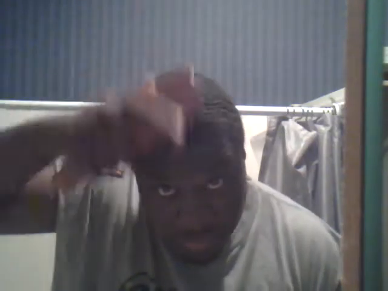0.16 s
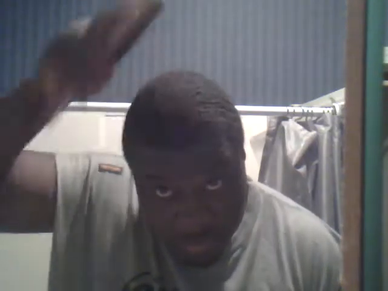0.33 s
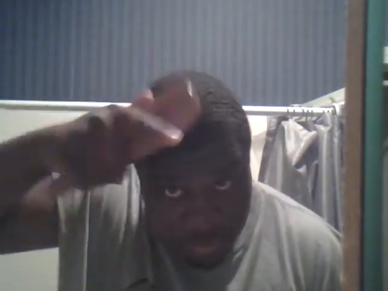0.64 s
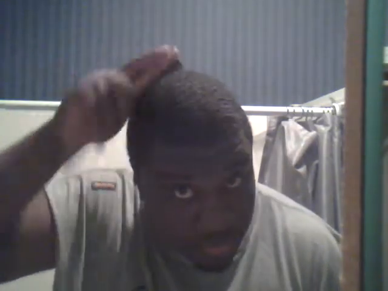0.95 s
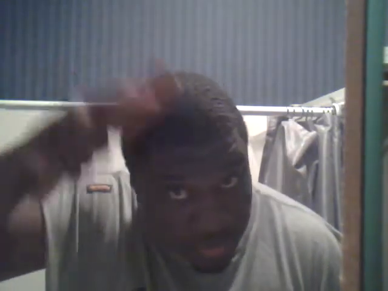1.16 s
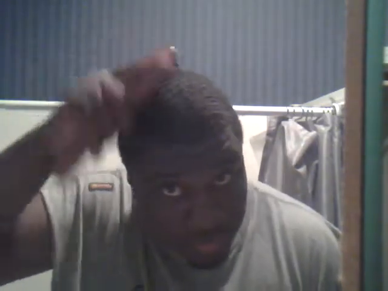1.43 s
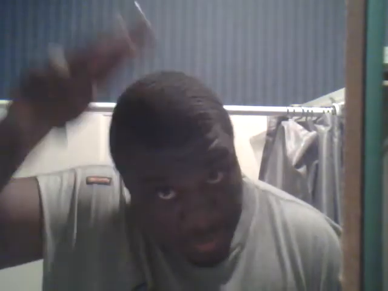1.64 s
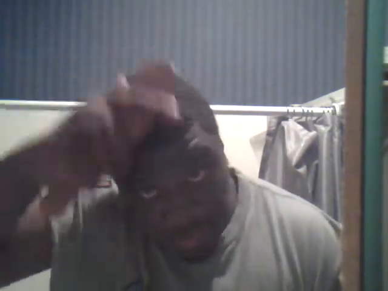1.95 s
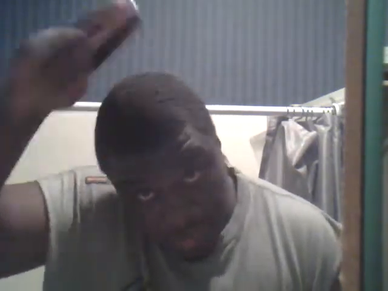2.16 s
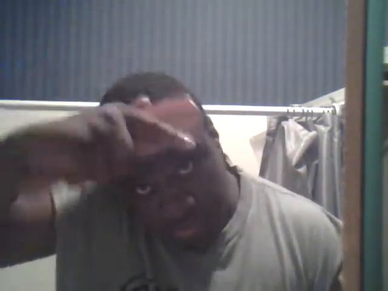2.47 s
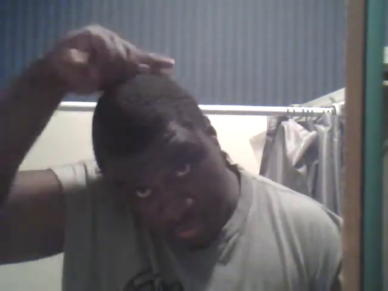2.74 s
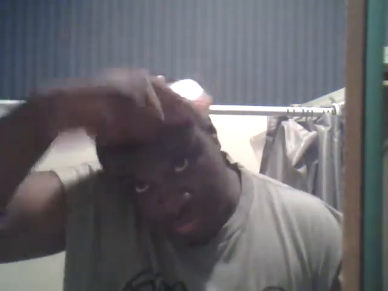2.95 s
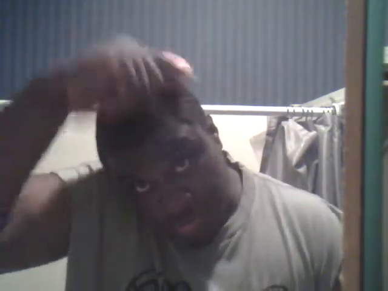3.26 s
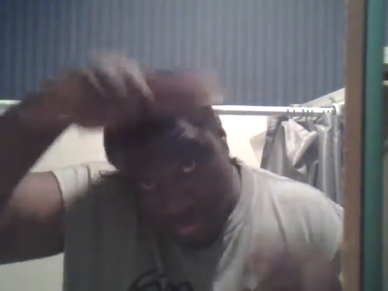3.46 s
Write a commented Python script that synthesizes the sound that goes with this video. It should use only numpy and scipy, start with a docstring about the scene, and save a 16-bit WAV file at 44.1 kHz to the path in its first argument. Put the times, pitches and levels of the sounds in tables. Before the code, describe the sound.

A bristle brush sweeps short hair in quick strokes of about a quarter second. The tail of one opens the sound, then strokes start near 0.25, 0.7, 1.1, 1.6, 2.0, 2.5, 2.95 and 3.4 seconds, bright, hissy and raspy, softer later. Faint return grazes come near 1.3 and 3.2, dull arm bumps near 0.8 and 1.3. A steady low fan hum continues throughout the small, close-miked bathroom.

```python
"""Small bathroom: a bristle brush sweeps over short hair about twice a second, over a steady fan.
Each stroke is a shower of random bristle flicks, coloured as broad hiss, lower rasp, dull scrub and
a sharp ring near 6.4 kHz; stray hairs crackle and the moving arm bumps softly.
The fan is coloured noise, steady tones, narrow resonances and a thin hiss.
Two close microphones feed a stereo widener, which thins the bass and hollows the treble like a comb."""
import sys
import numpy as np
from scipy import signal
from scipy.fft import rfft, irfft
from scipy.io import wavfile
from scipy.ndimage import uniform_filter1d

SR = 44100
rng = np.random.default_rng(int(sys.argv[2]) if len(sys.argv) > 2 else 0)


def output_pcm(signal):
    """Save a mono or channel-first signal as 16-bit PCM at the path in sys.argv[1].

    Samples are clipped to [-1, 1] before scaling.
    """
    pcm = np.clip(np.atleast_2d(signal).T, -1, 1) * 32767
    wavfile.write(sys.argv[1], SR, np.round(pcm).astype(np.int16))


N = 158760
LEFT_RIGHT_SIGNS = np.array([[1], [-1]])


def undb(db):
    """Decibels to amplitude gain."""
    return 10 ** (np.asarray(db) / 20)


def fft_hz():
    """Bin frequencies of the full-length spectrum."""
    return np.arange(N // 2 + 1) * SR / N


def colour(white, spectrum):
    """Shape white sound of unit power to a spectral density, interpolated over log frequency."""
    hz, db_per_hz = np.array(spectrum, float).T
    f = np.maximum(fft_hz(), 1)
    gain = undb(np.interp(np.log(f), np.log(hz), db_per_hz)) * np.sqrt(SR / 2)
    return irfft(rfft(white) * gain, N)


def narrow(hz, width_hz):
    """Noise of unit power passed by one resonance."""
    response = 1 / (1 + 2 * ((fft_hz() - hz) / width_hz) ** 2)
    noise = irfft(rfft(rng.standard_normal(N)) * response, N)
    return noise / noise.std()


def walk(rate_hz):
    """Smooth random drift of unit spread: held random values under a moving average."""
    hold = max(int(SR / rate_hz), 2)
    steps = np.repeat(rng.standard_normal(N // hold + 1), hold)
    drift = uniform_filter1d(steps, hold)[:N]
    return drift / drift.std()


def lean(x, share):
    """Place one sound between the microphones: -1 right, 1 left."""
    return x * (1 + share * LEFT_RIGHT_SIGNS)


def tilt(pair, right_db):
    """Favour the right microphone; mid and side of an unrelated pair keep unit power."""
    gain = undb(np.array([[-right_db], [right_db]]) / 2)
    return pair * 2 * gain / np.sqrt(np.sum(gain ** 2))


def late(pair, lag_ms):
    """Delay the left channel by a fraction of a millisecond through its phase."""
    delay = np.exp(-2j * np.pi * fft_hz() * lag_ms / 1000)
    return np.array([irfft(rfft(pair[0]) * delay, N), pair[1]])


# faint hiss of the fan: f/Hz, level/dB per Hz
FLOOR_SPECTRUM = [(1000, -106), (2200, -86.5), (2700, -94.5), (3250, -86.5), (4500, -98), (7000, -93),
                  (9000, -99), (12000, -101), (15700, -103)]


def thin_hiss():
    """Steady noise, unrelated at the two microphones and louder at the right one."""
    return tilt(colour(rng.standard_normal((2, N)), FLOOR_SPECTRUM), right_db=5)


# rushing air common to both microphones: f/Hz, level/dB per Hz
AIR_MID_SPECTRUM = [(30, -79), (60, -74.5), (95, -64.5), (155, -61.5), (185, -57.5), (226, -67),
                    (250, -45.5), (280, -49.5), (305, -55), (390, -62), (430, -68), (510, -71.5),
                    (580, -64.5), (660, -71), (690, -83), (770, -77.5), (900, -81), (1050, -87),
                    (1130, -79), (1280, -81), (1500, -78), (1900, -87.5), (2600, -100), (4000, -125)]
# rushing air of opposite sign at the two microphones: f/Hz, level/dB per Hz
AIR_SIDE_SPECTRUM = [(30, -100), (60, -92), (95, -72), (200, -80), (260, -74.5), (400, -71.5), (480, -89),
                     (620, -70), (700, -72.5), (840, -88), (1020, -77), (1500, -83), (2000, -87),
                     (4000, -125)]


def rushing_air():
    """Turbulence as coloured noise, one part common and one part opposed."""
    mid = colour(rng.standard_normal(N), AIR_MID_SPECTRUM)
    side = colour(rng.standard_normal(N), AIR_SIDE_SPECTRUM)
    return mid + side * LEFT_RIGHT_SIGNS


# resonances of fan and duct: f/Hz, width/Hz, level/dB, lean (-1 right to 1 left)
RESONANCES = [(201.3, 11, -39, -0.019), (454.2, 8.4, -51, .1), (485, 4.2, -51, 0.16), (553.6, 21, -50, .1),
              (603.3, 12, -52.5, 0.31), (628.6, 8.4, -48.5, .44), (654.6, 8.2, -57.5, 0.45),
              (737, 6, -59.5, -0.38), (775, 1.7, -60, -.2), (794, 16, -56.5, -.1), (843, 3, -63.5, 0),
              (1104, 20, -60, -0.71), (1344, 8, -64.5, -0.0012), (1453, 18, -57.5, -0.058),
              (1523, 16, -61, -0.13)]
# faint high whines: f/Hz, width/Hz, level/dB, lean (-1 right to 1 left)
WHINES = [(5570, 110, -66.5, -.9), (11150, 340, -60.5, -.9)]


def resonances():
    """Narrow bands of noise, each leaning to one microphone."""
    out = 0
    for hz, width_hz, db, side in RESONANCES + WHINES:
        out = out + lean(undb(db) * narrow(hz, width_hz), side)
    return out


# motor and blade tones: f/Hz, level/dB RMS, lean (-1 right to 1 left), left delay/ms
HUM_TONES = [(120, -49.5, .38, 2.2), (168.8, -41, 0, .05), (240, -35.5, -.13, .02),
             (408.6, -54.5, -.1, .39), (457.4, -48.5, .13, 0), (479.7, -50, .11, .05),
             (506.2, -59.5, .05, .13), (528.5, -54, .05, .06), (626.2, -45.5, .43, .14),
             (648.5, -52.6, .3, .17), (670.8, -57.8, .64, .55), (719.6, -66.3, -.77, .2),
             (746, -65, -.46, 0), (768.4, -63, -.14, 0), (959.5, -71, .28, .11)]


def hum(t):
    """Steady sines; standing waves give each its own level and delay at the two microphones."""
    out = 0
    for hz, db, side, lag_ms in HUM_TONES:
        heard_s = t - np.array([[lag_ms / 1000], [0]])
        tone = np.sin(2 * np.pi * (hz * heard_s + rng.random()))
        out = out + lean(np.sqrt(2) * undb(db) * tone, side)
    return out


FAN_LEFT_LAG_MS = 0.036  # air and resonances only


def fan(t):
    """Air and resonances reach the left microphone late; hum and thin hiss add to them."""
    return late(rushing_air() + resonances(), FAN_LEFT_LAG_MS) + hum(t) + thin_hiss()


# dull bumps of the moving arm: t/s, length/s, level/dB re BUMP_BASE_DB
BUMPS = [(.82, .12, -4), (1.32, .16, 0)]
BUMP_HZ, BUMP_WIDTH_HZ, BUMP_BASE_DB = 138, 45, -43


def arm(t):
    """Low narrow noise under bell-shaped swells as the arm swings."""
    swell = sum(undb(db) * np.exp(-(2 * (t - at_s) / length_s) ** 2) for at_s, length_s, db in BUMPS)
    return lean(narrow(BUMP_HZ, BUMP_WIDTH_HZ) * swell * undb(BUMP_BASE_DB), 0)


FLICKS_PER_S, FLICK_SPREAD_DB = 10000, 4
SHARED_POWER = 0.13  # share of flick power common to both microphones
BRUSH_RIGHT_DB = 5


def flicks():
    """Bristles snap free at random, each with its own strength, mostly unlike at the two microphones."""
    strength = undb(FLICK_SPREAD_DB * np.clip(rng.standard_normal((3, N)), -2, 2))
    snaps = rng.random((3, N)) < FLICKS_PER_S / SR
    clicks = snaps * rng.choice([-1, 1], (3, N)) * strength
    pair = np.sqrt(1 - SHARED_POWER) * clicks[:2] + np.sqrt(SHARED_POWER) * clicks[2]
    return tilt(pair / clicks.std(), BRUSH_RIGHT_DB)


# stray hairs: f/Hz, level/dB per Hz, before the burst envelope
CRACKLE_SPECTRUM = [(1200, -102), (2200, -93.5), (3400, -90), (4500, -87), (7000, -101.5), (15000, -106)]
CATCHES_PER_S, CATCH_DECAY_S = 40, 0.0088


def crackle(t):
    """Hairs catch at random during a sweep; each starts a sharp, decaying burst of flicks."""
    touching = sum((t > start) & (t < start + length) for start, length, *_ in STROKES + GRAZES) > 0
    catches = touching * (rng.random(N) < CATCHES_PER_S / SR)
    bursts = signal.fftconvolve(catches, np.exp(-t / CATCH_DECAY_S))[:N]
    return colour(flicks() * bursts, CRACKLE_SPECTRUM)


ATTACK_S, RELEASE_S = 0.04, 0.058
ARCH_POWER = 1.64  # 2 is a round swell, 1 a pointed one


def sweep(t, start_s, length_s, peak, arch_db):
    """The brush lands, speeds up and slows over the curve of the head, then lifts."""
    landing = np.clip((t - start_s) / ATTACK_S, 0, 1)
    lifting = np.clip((start_s + length_s - t) / RELEASE_S, 0, 1)
    progress = np.clip((t - start_s) / length_s, 0, 1)
    return landing * lifting * undb(-arch_db * np.abs(2 * (progress - peak)) ** ARCH_POWER)


# brush strokes: t/s, length/s, fastest point (0-1), drop half a stroke from there/dB,
# then relative level/dB of hiss, ring, rasp, scrub; lead and arch below alter peak and drop per part
STROKES = [(-.18, .23, 0.43, 15, 4.5, 3, -1, 3), (0.247, .26, 0.43, 19.5, 0.5, 0.5, -2, -2),
           (.699, .22, 0.47, 6, -1.5, -1.5, -5, -13), (1.128, 0.24, 0.49, 15.5, -0.5, 0, -3.5, -13),
           (1.584, .235, 0.46, 16.5, -0.5, 0.5, -4.5, -5), (2.021, 0.29, .41, 7, -3.5, -6, -4.5, -1.5),
           (2.499, 0.24, 0.39, 5.5, -3, -5, -4.5, -4), (2.952, 0.26, 0.51, 6.5, -6.5, -8.5, -6.5, -5.5),
           (3.412, 0.22, 0.35, 8, -6, -7.5, -6, -5)]
# bristles graze the hair on the way back: same columns
GRAZES = [(1.315, 0.34, 1, 3, -24, -20, -10, -6), (3.177, 0.283, 0.72, 6.5, -23, -11, -8.5, -0.5)]


def effort(t, part, lead, steepness):
    """Gain of one part of the brush sound over all sweeps."""
    total = 0
    for start_s, length_s, peak, arch_db, *part_db in STROKES + GRAZES:
        total = total + undb(part_db[part]) * sweep(t, start_s, length_s, peak - lead, steepness * arch_db)
    return total


# flick colours, before the sweep gains: f/Hz, level/dB per Hz
HISS_SPECTRUM = [(800, -84.5), (2200, -121), (5200, -95.5), (7000, -79.5), (8800, -80), (10300, -84),
                 (11400, -83.5), (12600, -87), (15700, -86.5)]
RING_SPECTRUM = [(5200, -100), (5700, -75), (6100, -73.5), (6700, -73), (7100, -77), (7600, -87),
                 (9000, -110)]
RASP_SPECTRUM = [(1500, -100), (2250, -80), (2700, -85.5), (3150, -71.5), (3600, -82), (3950, -78),
                 (4500, -83.5), (5000, -87.5), (6500, -105)]
SCRUB_SPECTRUM = [(600, -102), (1150, -78), (1500, -85.5), (2200, -81), (2800, -106), (4000, -115)]
# spectrum, peak lead on the ring/share of stroke, arch steepness re hiss
BRUSH_PARTS = [(HISS_SPECTRUM, 0.054, 1), (RING_SPECTRUM, 0, 1.2),
               (RASP_SPECTRUM, -0.02, 0.7), (SCRUB_SPECTRUM, -0.03, 0.29)]
JUDDER_DB, JUDDER_HZ = 0.86, 90


def brush(t):
    """Hiss, ring and rasp of bristles and scrub on the scalp follow each sweep and judder together."""
    judder = undb(JUDDER_DB * walk(JUDDER_HZ))
    out = 0
    for part, (spectrum, lead, steepness) in enumerate(BRUSH_PARTS):
        out = out + colour(flicks() * effort(t, part, lead, steepness) * judder, spectrum)
    return out


ROOM_T60_S, ROOM_DB = 0.24, -5.5


def bathroom(x, t):
    """Hard walls add a short dense tail: decaying noise of unit energy, convolved."""
    tail_t = t[:SR // 2]
    tail = rng.standard_normal((2, len(tail_t))) * np.exp(-np.log(1000) * tail_t / ROOM_T60_S)
    tail /= np.sqrt(np.sum(tail ** 2, axis=1, keepdims=True))
    return x + undb(ROOM_DB) * signal.fftconvolve(x, tail, axes=1)[:, :N]


def scene():
    """Fan, arm and brush at the two microphones; only brush and crackle get the room tail."""
    t = np.arange(N) / SR
    return fan(t) + arm(t) + bathroom(brush(t) + crackle(t), t)


WIDENER_SAMPLES, TOP_HZ = 17, 15650


def record(dry):
    """The widener subtracts a delayed copy of the other microphone; a steep low-pass cuts the top."""
    delayed = np.pad(dry[::-1], ((0, 0), (WIDENER_SAMPLES, 0)), mode="reflect")[:, :N]
    low_pass = signal.ellip(10, .2, 80, TOP_HZ, fs=SR, output="sos")
    return signal.sosfilt(low_pass, dry - delayed)


dry = scene()
out = record(dry)
output_pcm(out)
```